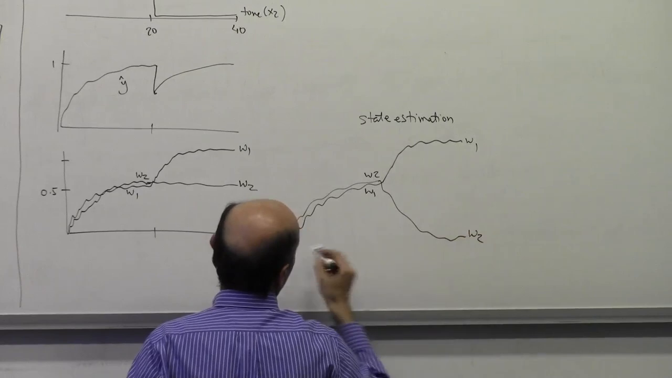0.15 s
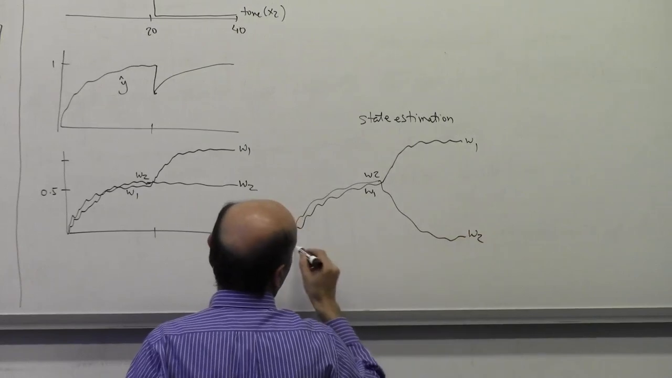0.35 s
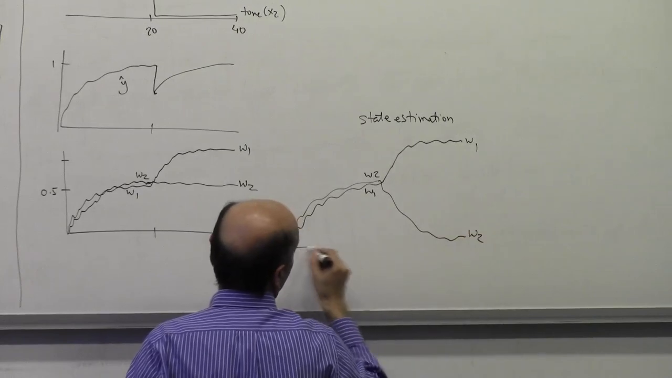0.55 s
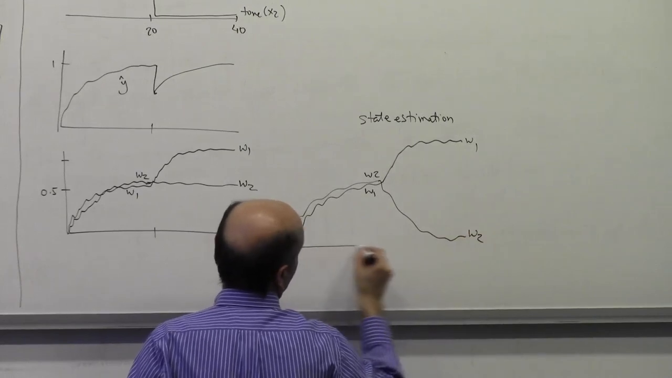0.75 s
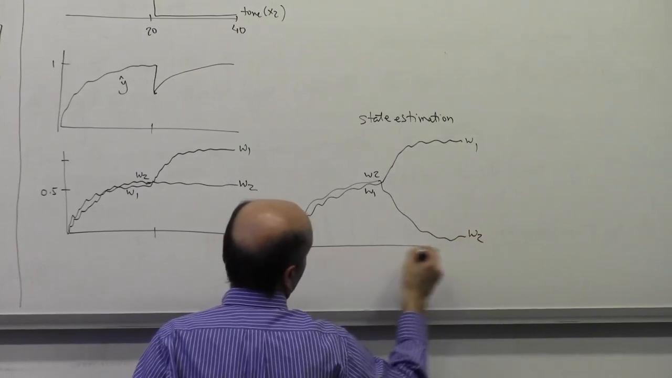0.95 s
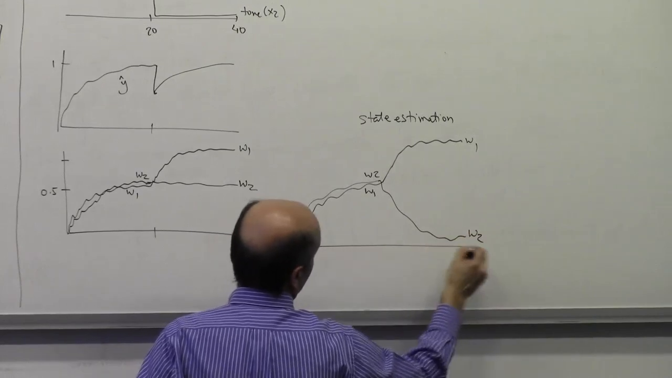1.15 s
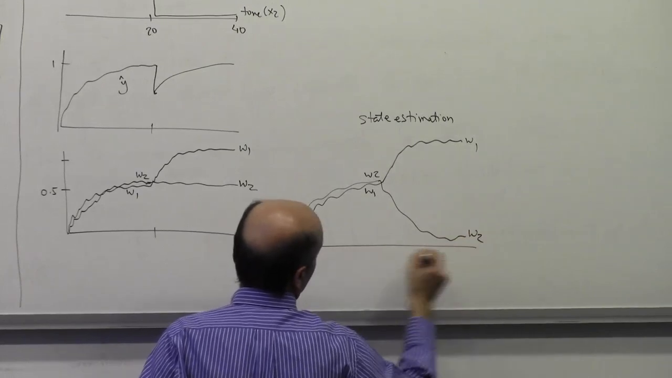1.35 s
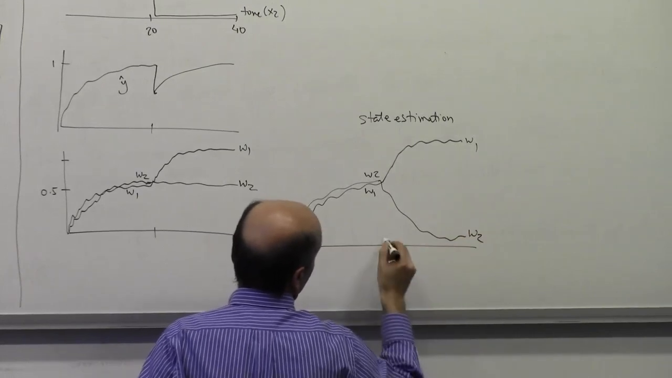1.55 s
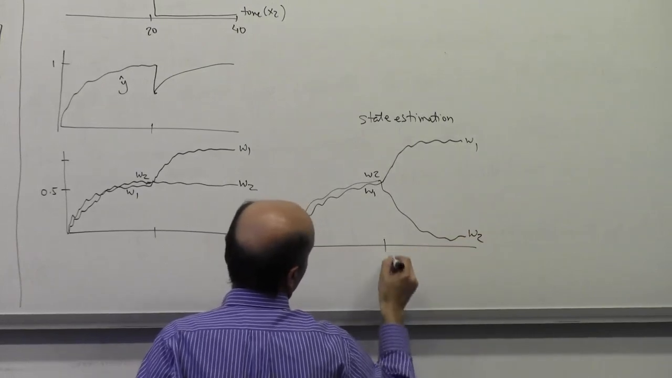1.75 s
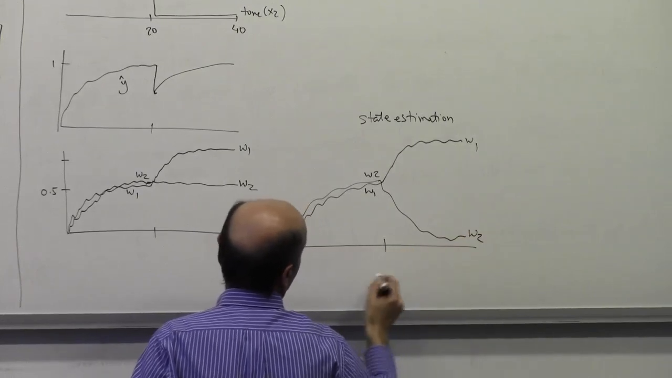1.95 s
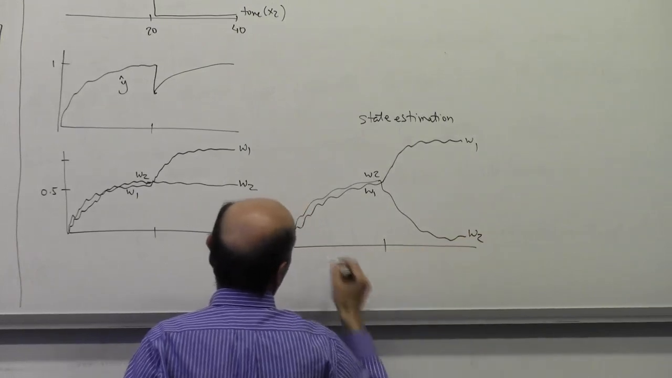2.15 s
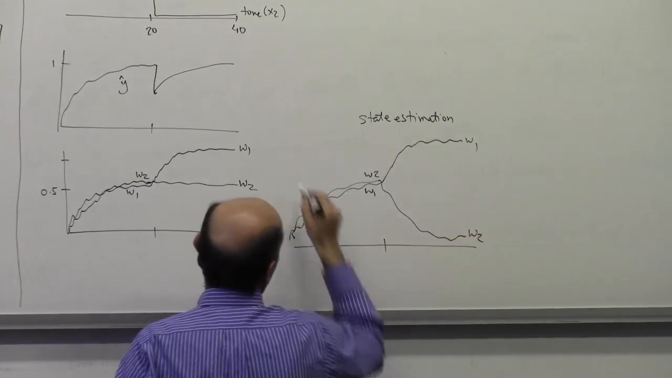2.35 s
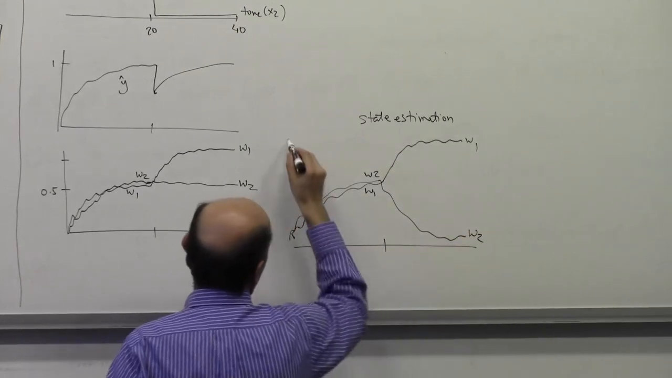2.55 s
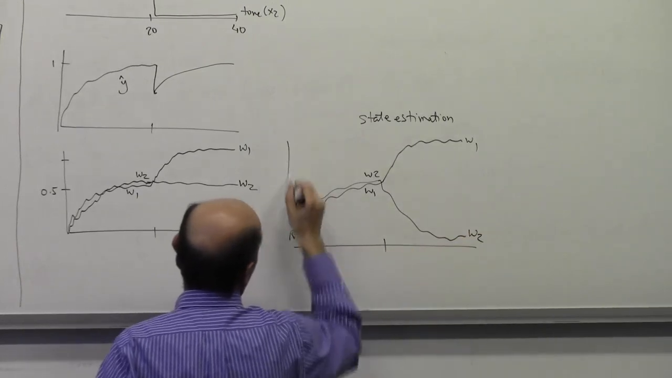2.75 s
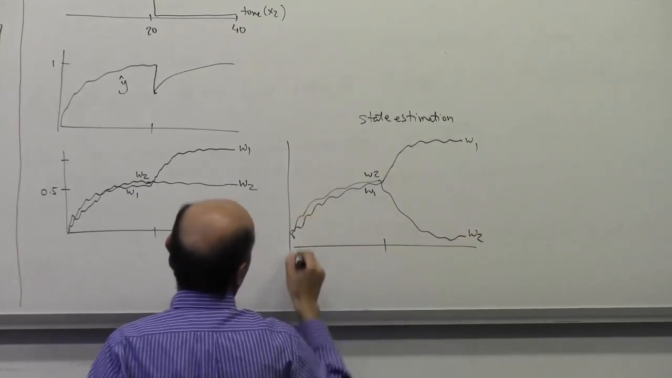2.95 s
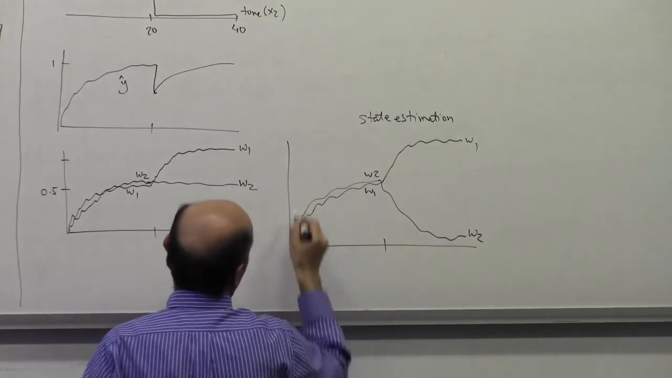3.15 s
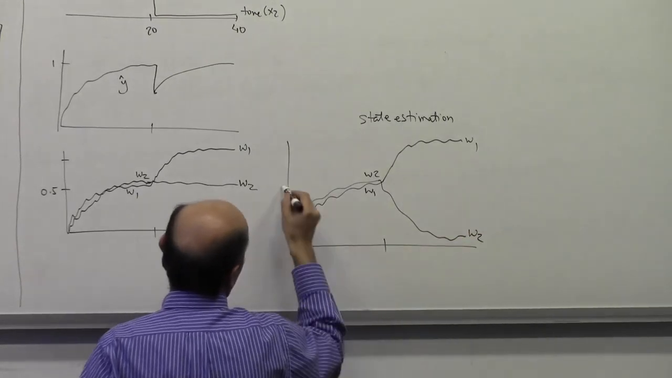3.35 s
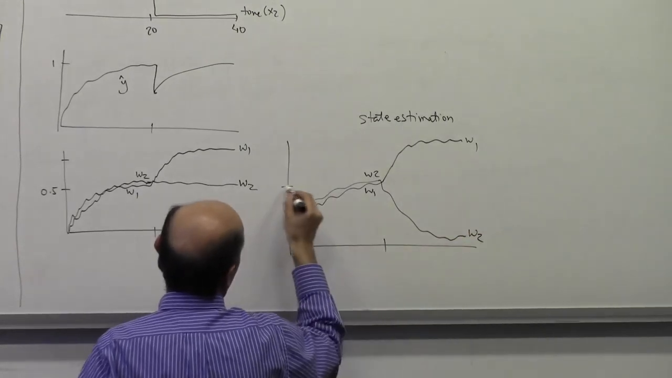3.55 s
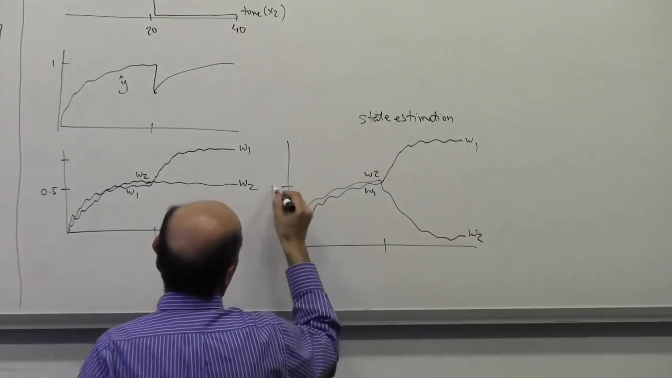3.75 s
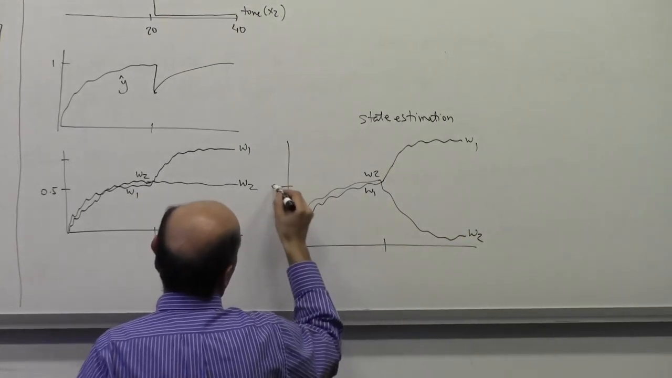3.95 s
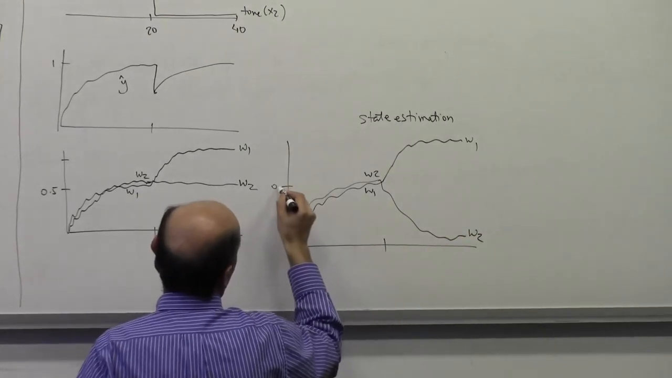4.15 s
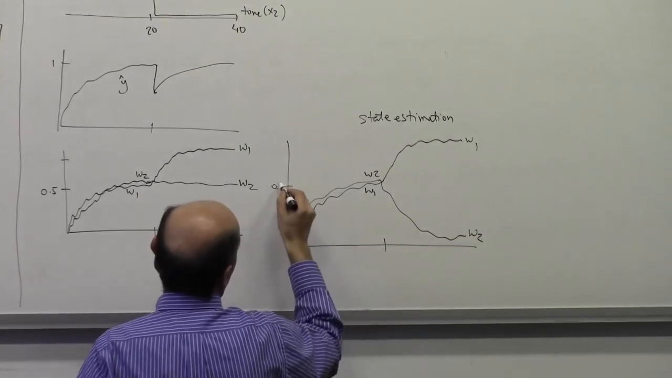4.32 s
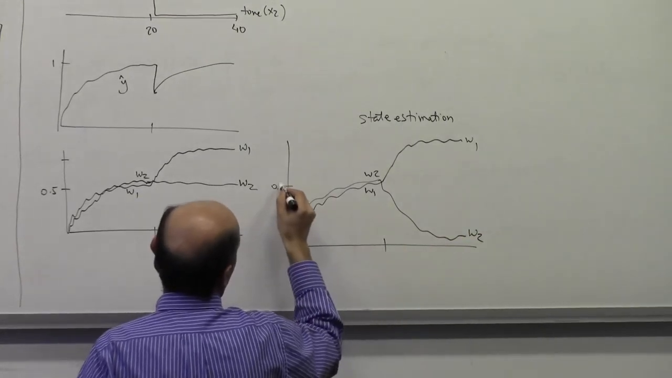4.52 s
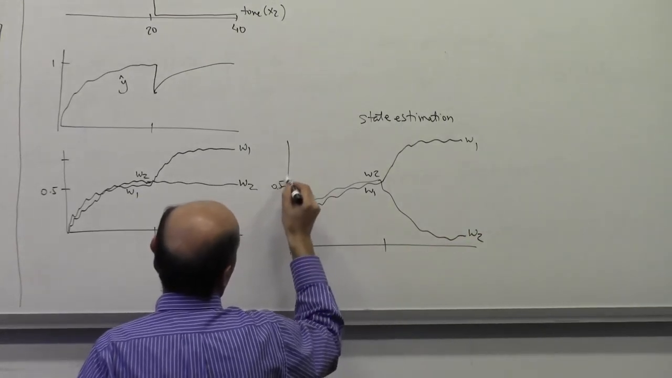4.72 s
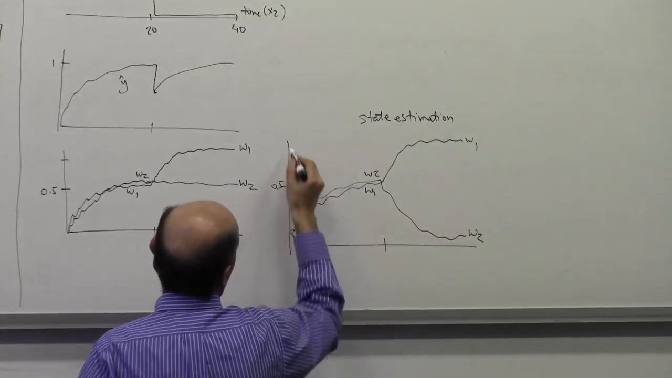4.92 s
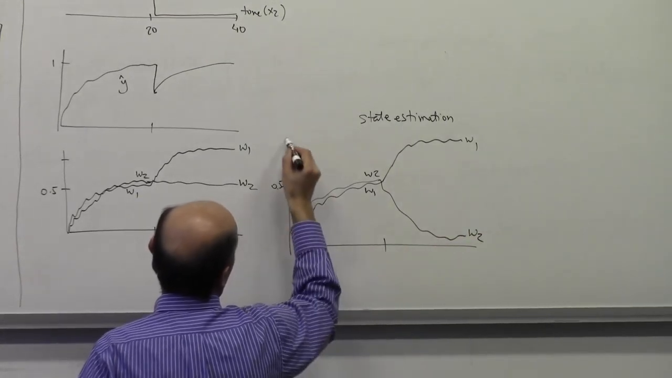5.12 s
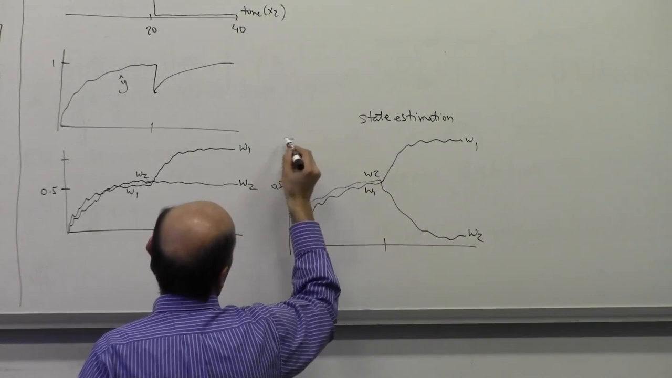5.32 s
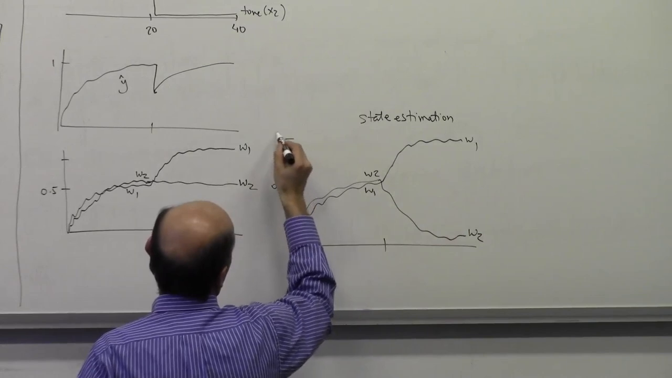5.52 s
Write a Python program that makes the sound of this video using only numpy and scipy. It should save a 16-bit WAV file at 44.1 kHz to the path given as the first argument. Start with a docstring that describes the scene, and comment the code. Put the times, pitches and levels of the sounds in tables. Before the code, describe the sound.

In a quiet room with low ventilation rumble, a felt marker hisses one long stroke on a whiteboard, then knocks and makes short strokes.

```python
"""Ventilation rumbles and whines faintly throughout. A sleeve brushes softly, before a felt marker
starts to write and again between its strokes. The marker draws two axes and their tick marks on a
wall-mounted whiteboard in a quiet room. Each landing of the tip knocks the panel, which rings in its own
modes. The sliding felt is random noise, sent partly through resonances that shift with the grip; where it
drags hard, it rasps. The room adds echoes, and the microphone adds its own hiss."""
import sys
import numpy as np
from scipy import signal
from scipy.fft import rfft, irfft
from scipy.io import wavfile

SR = 44100
rng = np.random.default_rng(int(sys.argv[2]) if len(sys.argv) > 2 else 0)


def master(y):
    """Save y as 16-bit WAV."""
    cut = np.clip(np.atleast_2d(y).T, -1, 1)
    pcm = np.round(cut * 32767)  # scale
    wavfile.write(sys.argv[1], SR, pcm.astype(np.int16))


N = 246078
TIME = np.arange(N) / SR  # s

# Levels in the event tables are relative: the functions below add shared gains.
# tip landings: [t/s, strength/dB, contact time/s, spot on the board (0 upper, 1 middle, 2 lower right)]
TAPS = [(0.478, -11.5, 0.0015, 1.744), (1.6551, 0.0, .0013, 2), (2.6618, 0.0, 0.0015, 0),
        (3.4434, -3, 0.00169, 1), (3.7768, -2.5, 0.0017, 1), (4.1229, -1.4, 0.0015, 1),
        (4.3654, -4.5, 0.00159, 1), (4.6533, -6, 0.0017, 1), (5.168, -2.5, 0.0018, 0)]
# ways the panel can ring: [f/Hz, time to fall by 60 dB/s, signed strength at upper, middle, lower right spot]
PANEL_MODES = [(282, 0.031, 0.53, 0.41, 0.64), (296.5, 0.076, -0.38, -0.47, -0.57),
               (335.8, 0.13, -0.18, -0.25, 0.029), (374.5, 0.15, 0.0047, 0.1, -0.04),
               (441.8, 0.065, 0.15, 0.356, -0.0047), (450.8, 0.03, -0.31, -0.72, 0.18),
               (469, 0.08, 0.017, -0.054, 0.018), (509, 0.051, 0.118, -0.22, -0.13),
               (580, 0.042, 0.018, -0.52, 0.034), (637, 0.0095, 0.48, 2.5, -0.22),
               (850, 0.12, -0.039, 0.09, -0.019), (1020, 0.018, -0.015, -0.23, -0.57),
               (1226, 0.036, -0.034, -0.27, 0.24), (1310, 0.053, 0.042, 0.04, -.16),
               (1750, 0.1, 0.069, 0.25, -.04), (1807, 0.021, -0.29, -0.44, -0.06)]
# felt slides: [start t/s, length/s, level/dB, swell from start to end/dB,
#               tuning of the resonances/ratio, brightness/dB, resonant share of the power/0-1]
STROKES = [(0.54, 0.7, -58, -0.5, 1.0, 0, .68), (1.662, 0.069, -60.5, -2, 0.9, 0, .35),
           (2.688, 0.357, -59.5, 10.5, 1.04, 6, 0.2), (3.458, 0.085, -58.5, -3, 0.86, -5, 0.3),
           (3.798, 0.18, -65.5, -1, 0.9, -6, .4), (4.669, 0.054, -58, -5, 0.89, -11, 0.6),
           (5.186, 0.068, -59, -3, 0.88, -5, 0.7)]
# how the grip tunes tip and barrel, held before and after these times:
# [t/s, low f/Hz, middle f/Hz, high f/Hz (all before the stroke's tuning), brightness/dB]
GRIP = [(0.58, 3700, 6400, 9100, -2), (0.85, 4250, 6250, 9600, -1.5), (0.89, 4450, 6200, 8200, 1),
        (1.04, 4900, 6470, 8660, 9), (1.20, 5650, 6370, 9900, 2)]
# the low, middle and high resonance of the marker: [width of each filter pass/Hz, level/dB per Hz]
NIB = [(700, 0), (950, 0.5), (1550, 0.5)]
# colour of the plain friction hiss: [f/Hz, level/dB per Hz]
FELT_COLOUR = [(1200, -13), (2200, 0), (3000, -2.5), (5000, 1), (7500, -0.5), (9800, -2.5), (11400, -4),
               (13000, -11), (16000, -7)]
# hard drags that shake a high panel mode: [t of the peak/s, length/s, level/dB]
DRAGS = [(2.715, .03, -66), (2.867, 0.11, -65), (3.928, .06, -62.5), (4.45, 0.1, -66.5), (4.70, .03, -69)]
# sleeve brushes as the arm moves: [t of the peak/s, length/s, level/dB, crispness/dB]
SLEEVE_BRUSHES = [(0.13, 0.096, -54.5, -0.5), (2.012, .05, -55, -8), (2.56, 0.017, -61.5, 10.5)]
# colour of the cloth: [f/Hz, level/dB per Hz]
SLEEVE_COLOUR = [(250, -4), (450, -4), (850, 2.5), (1300, -12), (1800, -4.5), (3500, -18), (9000, -22)]
# how fast room echoes die at each pitch: [f/Hz, time to fall by 60 dB/s]
ROOM_T60 = [(150, 0.84), (350, 0.5), (1000, 0.16), (8000, 0.41)]
# colour of the duct rumble: [f/Hz, level/dB per Hz]
RUMBLE_COLOUR = [(10, 5), (22, 0.5), (42, -2), (62, 1.5), (80, -2), (92, -5.5), (110, -24)]
# colour of the rushing air: [f/Hz, level/dB per Hz]
AIR_COLOUR = [(62, -11.5), (105, -6), (129, -3.5), (158, -2), (190, -2.5), (220, -12), (258, -11),
              (335, -14.5), (365, -12), (548, -25), (576, -22.5), (643, -22), (755, -25.5), (1250, -27),
              (2000, -37), (2600, -61), (4400, -120)]
# steady fan and mains tones: [f/Hz, rms level before wavering/dB]
TONES = [(120, -48.5), (538, -67), (721, -69.5), (1072, -89), (1211, -73), (3951, -84)]
# colour of the microphone hiss: [f/Hz, level/dB per Hz]
HISS_COLOUR = [(1180, -21), (2000, -0.5), (3550, -1.5), (4000, -1.5), (5050, -2.5), (7550, -3.5),
               (15500, -5.5)]
# stereo width, as the level of side against mid: [f/Hz, level/dB]
WIDTH = [(25, -54), (60, -55), (125, -37.5), (250, -31.5), (500, -17), (1000, -15), (2000, -11), (4000, -7),
         (8000, -6), (13000, -5.5)]

# every stroke gathers speed and lifts off alike
STROKE_ATTACK_S, STROKE_RELEASE_S = 0.028, 0.035
# crispness acts on the cloth's sound above this
CRISP_HZ = 1600
# the duct flow ebbs once and recovers: its base gain, then the middle, length and depth of the lull
FLOW_DB, LULL_S, LULL_LENGTH_S, LULL_DB = -32, 2.9, 1.98, -4
# a fan whines steadily, then slows: the whine sinks and grows up to a ceiling (before wavering)
WHINE_HZ, WHINE_DB, WHINE_TOP_DB = 1381, -70, -62
FAN_SLOWS_S, SAG_HZ_PER_S, GROWTH_DB_PER_S = 2.8, 11.5, 4.5
# rms of the middle signal of air and hiss (the hiss before its buzz)
AIR_DB, HISS_DB = -42.5, -57.5
CUTOFF_HZ = 15800


def strokes(level_db=-0.05):
    """Sliding felt hisses, partly plain and partly through the three resonances that the grip tunes."""
    rows = np.array(STROKES)
    current = np.maximum(np.searchsorted(rows[:, 0], TIME) - 1, 0)  # latest stroke at each sample
    *_, tuning, stroke_bright_db, share = rows[current].T
    *centres, grip_bright_db = in_time(GRIP)
    bright_db = stroke_bright_db + grip_bright_db
    ring, power = 0, 0
    for k, (hz, (width_hz, mode_db)) in enumerate(zip(tuning * np.array(centres), NIB)):
        band = twice_resonant(friction(grain_db=2.0), hz, width_hz)
        # half the brightness is taken from the low resonance and half is added to the high one
        gain = np.sqrt(width_hz) * from_db(mode_db + bright_db * (k - 1) / 2)
        ring = ring + gain * rms_one(band)
        power = power + gain ** 2
    plain = coloured(friction(grain_db=1.0), FELT_COLOUR)
    hiss = np.sqrt(share / power) * ring + np.sqrt(1 - share) * plain
    motion = sum(slide(s, length, db, swell) for s, length, db, swell, *_ in STROKES)
    return from_db(level_db) * hiss * motion


def slide(start_s, length_s, level_db, swell_db):
    """Gain of one stroke: it sets in, swells or ebbs evenly in dB, and lifts off."""
    t = TIME - start_s
    attack = np.clip(t / STROKE_ATTACK_S, 0, 1)
    release = np.clip((length_s - t) / STROKE_RELEASE_S + 0.5, 0, 1)
    progress = np.clip(t / length_s, 0, 1)
    return attack * release * from_db(level_db + swell_db * (progress - 0.5))


def friction(grain_db):
    """Countless fibres slip at random, in clumps a few milliseconds long."""
    return rng.standard_normal(N) * from_db(grain_db * drift(130))


def taps():
    """The felt presses for half a sine; each panel mode answers by its strength at the spot that is hit."""
    hz, t60, *shapes = np.transpose(PANEL_MODES)
    t = TIME[:SR // 3]
    rings = np.cos(2 * np.pi * hz[:, None] * t) * np.exp(-np.log(1000) * t / t60[:, None])
    out = np.zeros(N)
    for s, level_db, contact_s, spot in TAPS:
        # a spot between two of the known ones blends their shapes
        shape = np.array([np.interp(spot, np.arange(len(mode)), mode) for mode in np.transpose(shapes)])
        push = np.sin(np.pi * t[t < contact_s] / contact_s)
        start = round(s * SR)
        knock = np.convolve(shape @ rings, push / push.sum())[:N - start]
        out[start:][:len(knock)] += from_db(level_db) * knock
    return out


def drag(hz=1790, width_hz=190, level_db=3.0):
    """A dry rasp where the felt drags hard enough to shake the panel."""
    rasp = twice_resonant(friction(grain_db=3.0), hz, width_hz)
    motion = sum(from_db(db) * arch(s, length) for s, length, db in DRAGS)
    return from_db(level_db) * rms_one(rasp) * motion


def sleeve():
    """Shirt cloth brushes softly, now dull, now crisp, as its treble is turned down or up."""
    cloth = coloured(friction(grain_db=2.5), SLEEVE_COLOUR)
    treble = signal.sosfiltfilt(signal.butter(2, CRISP_HZ, "high", fs=SR, output="sos"), cloth)
    out = np.zeros(N)
    for s, length, db, crisp_db in SLEEVE_BRUSHES:
        out += from_db(db) * arch(s, length) * (cloth + (from_db(crisp_db) - 1) * treble)
    return out


def room(x, first_echo_s=0.014):
    """A diffuse tail that fades in from the first wall echo and dies band by band."""
    t, out = TIME[:SR // 2], 0
    edges = np.geomspace(100, 15000, 7)  # Hz
    for low, high in zip(edges, edges[1:]):
        centre = np.sqrt(low * high)
        band = signal.butter(2, [low, high], "band", fs=SR, output="sos")
        mid, side = signal.sosfilt(band, rng.standard_normal((2, len(t))))
        spread = mid + side * from_db(at_hz(WIDTH, centre)) * np.array([[1], [-1]])
        out = out + spread * from_db(-60 * t / at_hz(ROOM_T60, centre))
    tail = out * np.clip(t / first_echo_s - 1, 0, 1)
    tail = tail / np.sqrt(np.sum(tail[0] ** 2))
    return signal.fftconvolve(x[None], tail, axes=1)[:, :N]


def ventilation(duct_hz=54, duct_width_hz=8, duct_db=-4.5, rumble_db=-1.0, waver_db=1.5):
    """Duct rumble with one booming resonance, rushing air, faint tones and a sinking whine."""
    boom = resonance(rng.standard_normal(N), duct_hz, duct_width_hz)
    boom = rms_one(resonance(boom, duct_hz, 2 * duct_width_hz))
    flow = from_db(FLOW_DB + LULL_DB * arch(LULL_S, LULL_LENGTH_S))
    low = flow * (from_db(rumble_db) * diffuse(RUMBLE_COLOUR) + from_db(duct_db) * boom)
    tones = np.zeros(N)
    for hz, db in TONES:
        tones += from_db(db + waver_db * drift(4.4)) * np.sin(2 * np.pi * hz * TIME + drift(4.8))
    air = from_db(AIR_DB) * diffuse(AIR_COLOUR)
    return low + air + np.sqrt(2) * (tones + fan_whine())  # root 2 turns rms into peak level


def fan_whine(waver_db=2.5, wobble_rad=0.28):
    """One thin tone, steady at first, that sinks and grows as the fan slows."""
    slowing_s = np.maximum(TIME - FAN_SLOWS_S, 0)
    hz = WHINE_HZ - SAG_HZ_PER_S * slowing_s
    db = np.minimum(WHINE_DB + GROWTH_DB_PER_S * slowing_s, WHINE_TOP_DB)
    phase = 2 * np.pi * np.cumsum(hz) / SR + wobble_rad * drift(11)
    return from_db(db + waver_db * drift(10.0)) * np.sin(phase)


def microphone_hiss(buzz=0.23):
    """Even hiss whose strength ripples 360 times a second: a slight mains buzz."""
    ripple = np.sin(2 * np.pi * 360 * TIME)
    return from_db(HISS_DB) * diffuse(HISS_COLOUR) * (1 + buzz * ripple)


def diffuse(spectrum):
    """Stereo noise, alike in both channels in the bass and wider in the treble."""
    mid, side = (coloured(white, spectrum) for white in rng.standard_normal((2, N)))
    side = irfft(rfft(side) * from_db(at_hz(WIDTH, np.fft.rfftfreq(N, 1 / SR))), N)
    return np.array([mid + side, mid - side])


def coloured(source, spectrum):
    """Shape a source by a spectrum that falls steeply beyond its ends; rms 1."""
    hz = np.fft.rfftfreq(N, 1 / SR)
    top = 1 / (1 + (hz / spectrum[-1][0]) ** 20)
    bottom = 1 / (1 + (spectrum[0][0] / np.maximum(hz, 1)) ** 10)
    return rms_one(irfft(rfft(source) * from_db(at_hz(spectrum, hz)) * top * bottom, N))


def resonance(x, hz, width_hz, size=128):
    """A band-pass with gain 1 on top whose centre may move, updated once per block of samples."""
    hz, r = np.broadcast_to(hz, N), np.exp(-np.pi * width_hz / SR)
    zeros = np.array([1, 0, -1]) * (1 - r * r) / 2
    out, state = np.zeros(N), np.zeros(2)
    for i in range(0, N, size):
        poles = [1, -2 * r * np.cos(2 * np.pi * hz[i] / SR), r * r]
        out[i:i + size], state = signal.lfilter(zeros, poles, x[i:i + size], zi=state)
    return out


def twice_resonant(x, hz, width_hz):
    """Two passes of one resonance, for steeper sides."""
    return resonance(resonance(x, hz, width_hz), hz, width_hz)


def arch(peak_s, length_s):
    """A smooth rise and fall of height 1, above half its height for the given length."""
    return np.exp(-np.log(2) * np.minimum((2 * (TIME - peak_s) / length_s) ** 2, 60))


def drift(rate_hz):
    """Slow random wander with spread 1, weak above the given rate."""
    hz = np.fft.rfftfreq(N, 1 / SR)
    return rms_one(irfft(rfft(rng.standard_normal(N)) / (1 + (hz / rate_hz) ** 2), N))


def in_time(rows):
    """Each column of a curve at every sample."""
    s, *columns = np.transpose(rows)
    return [np.interp(TIME, s, c) for c in columns]


def at_hz(points, hz):
    """Read a curve over frequency, with straight lines on a log-frequency axis."""
    freq, value = np.transpose(points)
    return np.interp(np.log(np.maximum(hz, 1)), np.log(freq), value)


def from_db(db):
    """Decibels to gain."""
    return 10 ** (np.asarray(db) / 20)


def rms_one(x):
    """Scale to unit rms."""
    return x / np.sqrt(np.mean(x ** 2) + 1e-20)


def scene(tap_room_db=-19, rub_room_db=-9, rub_db=3.0):
    """Marker and sleeve straight ahead, their room sound, and the background."""
    knocks = taps()
    rubs = from_db(rub_db) * (strokes() + drag() + sleeve())
    echoes = room(from_db(tap_room_db) * knocks + from_db(rub_room_db) * rubs)
    return knocks + rubs + echoes + ventilation() + microphone_hiss()


def record(dry):
    """A steep low-pass removes the highest treble."""
    return signal.sosfilt(signal.ellip(12, 0.1, 80, CUTOFF_HZ, fs=SR, output="sos"), dry)


dry = scene()
out = record(dry)
master(out)
```